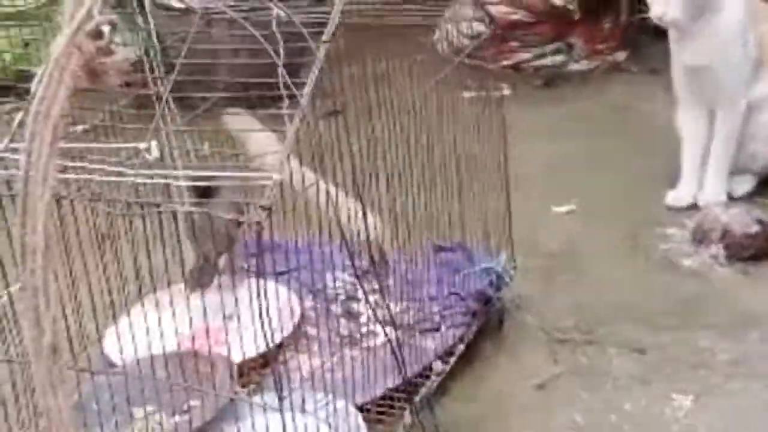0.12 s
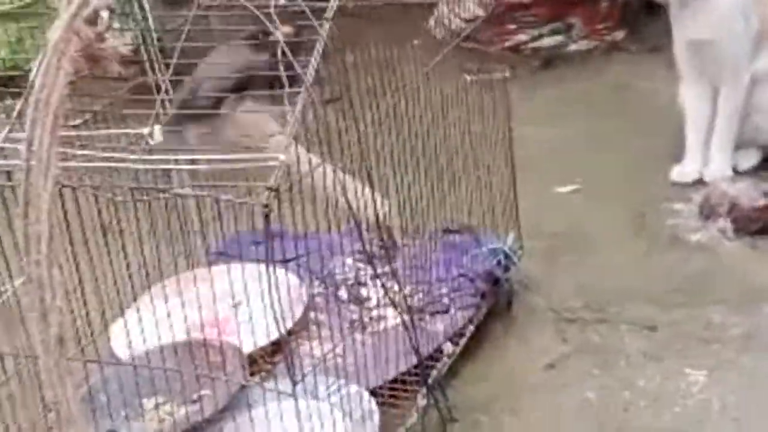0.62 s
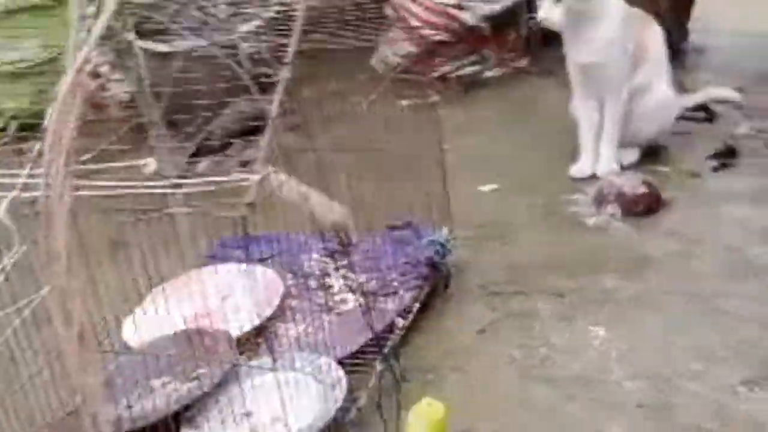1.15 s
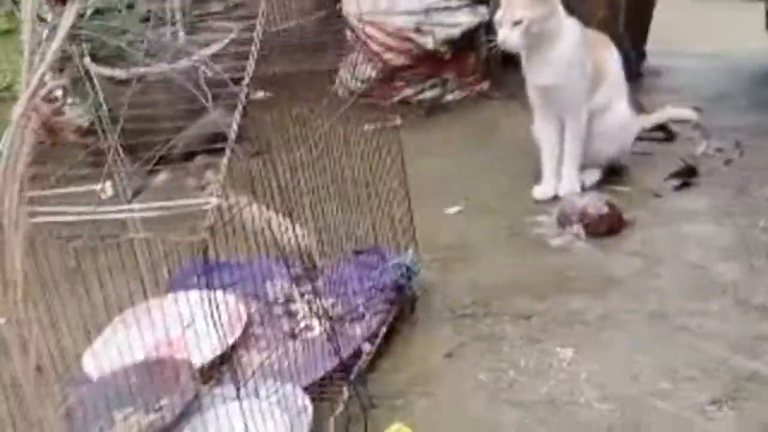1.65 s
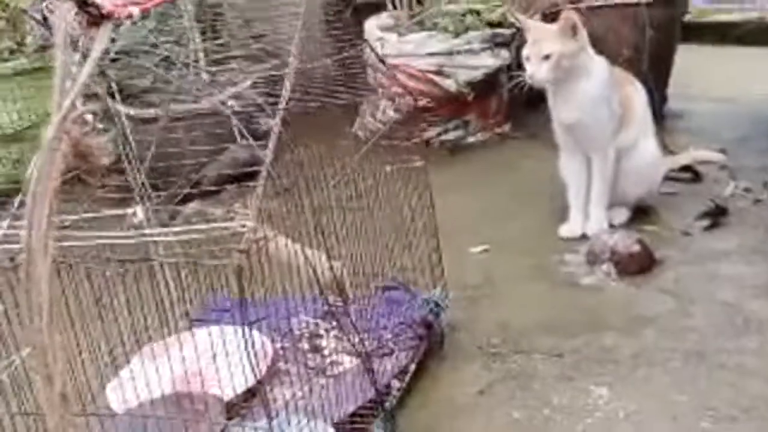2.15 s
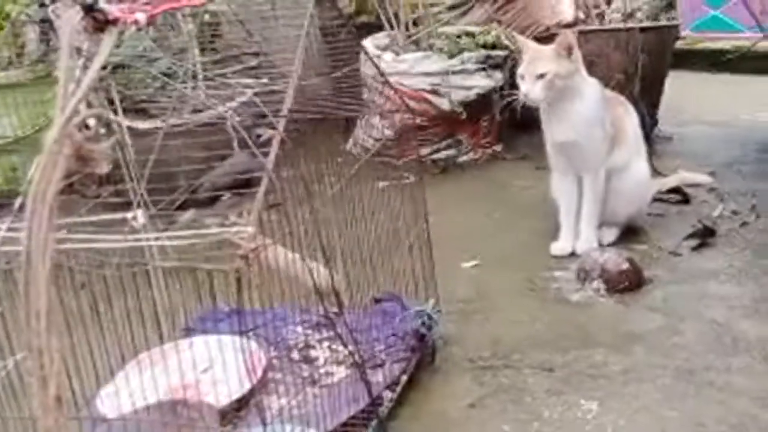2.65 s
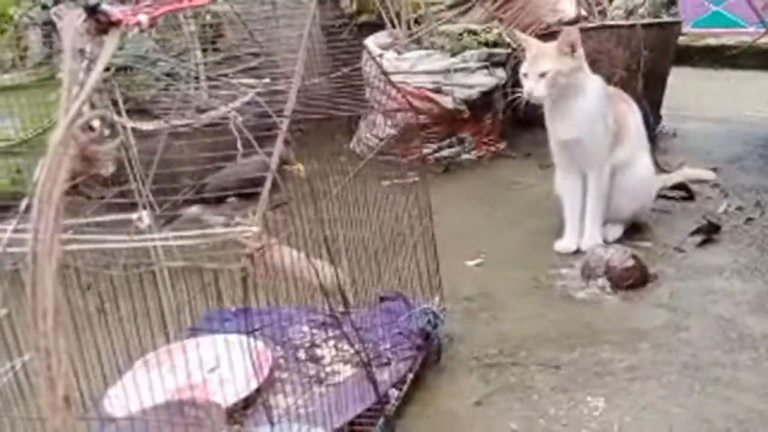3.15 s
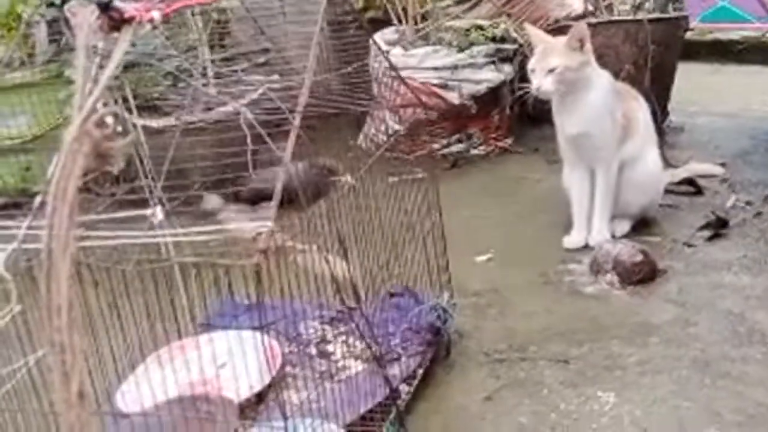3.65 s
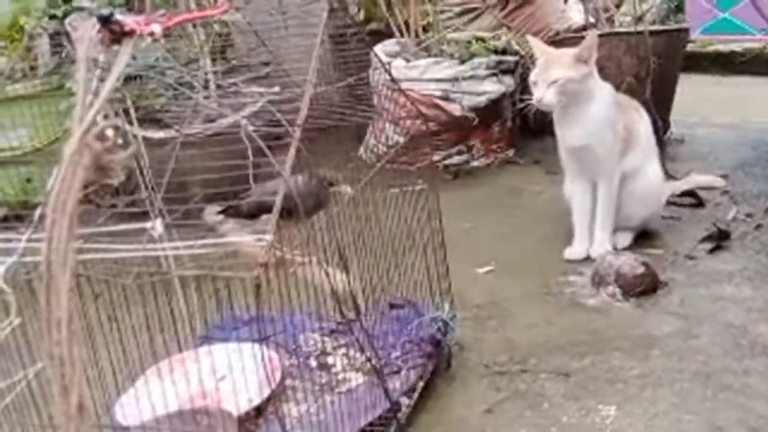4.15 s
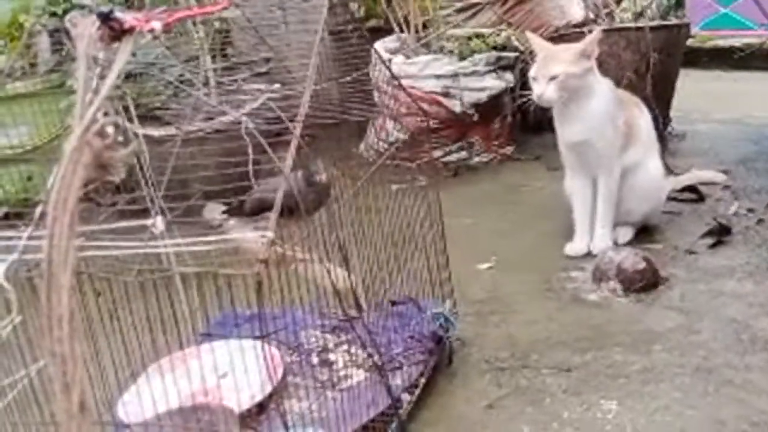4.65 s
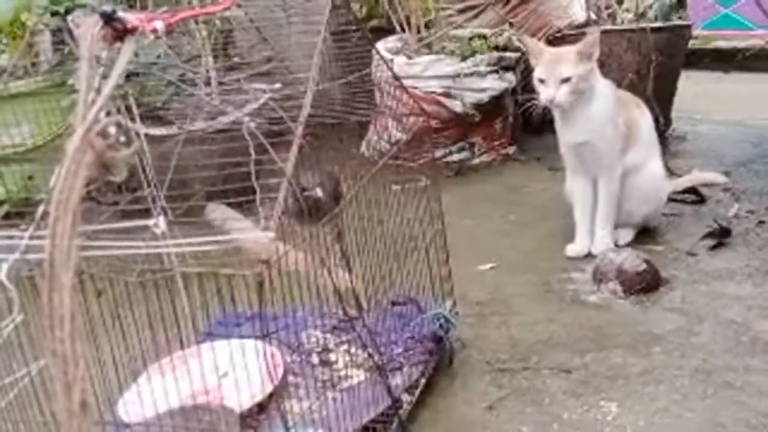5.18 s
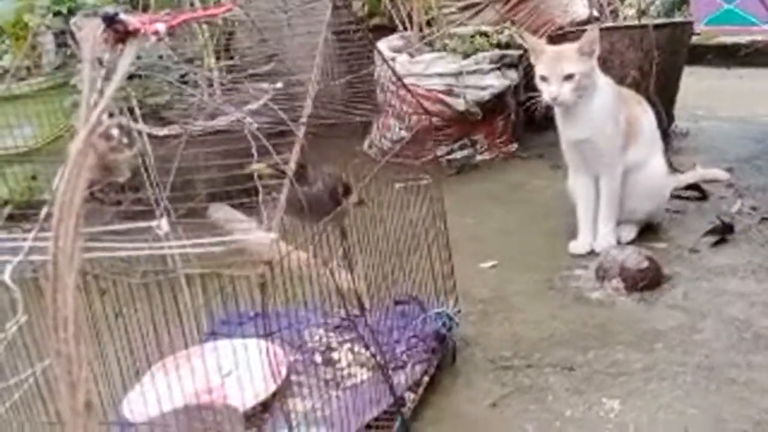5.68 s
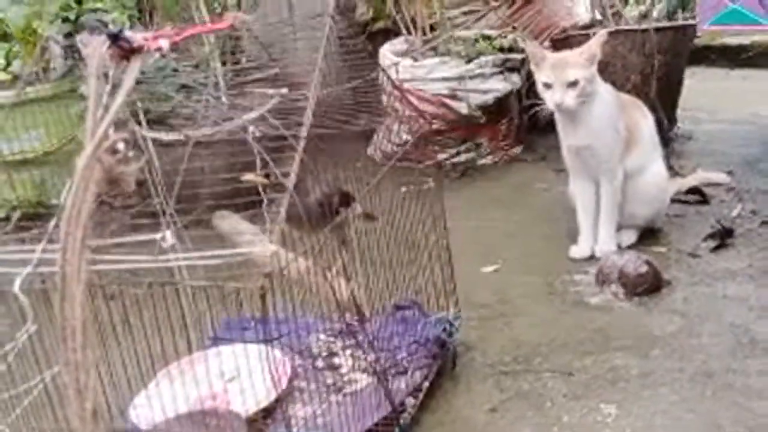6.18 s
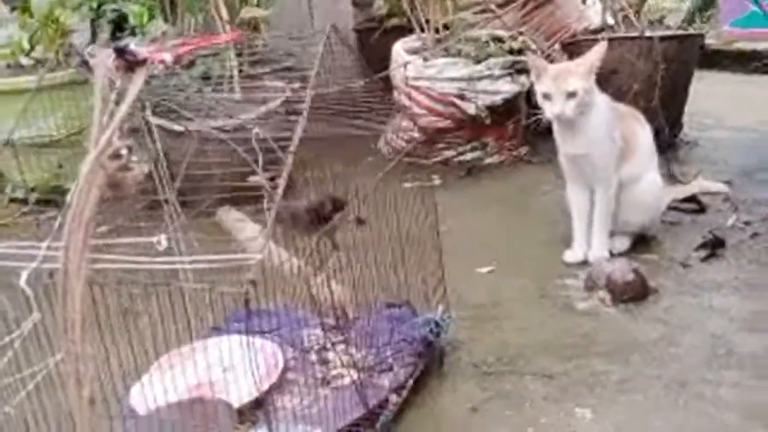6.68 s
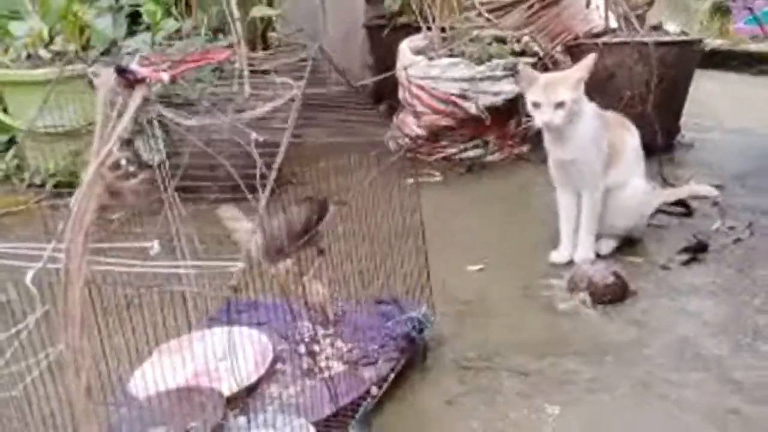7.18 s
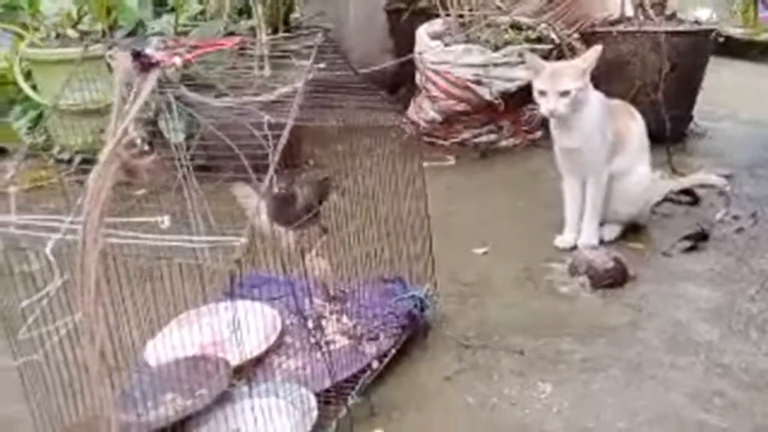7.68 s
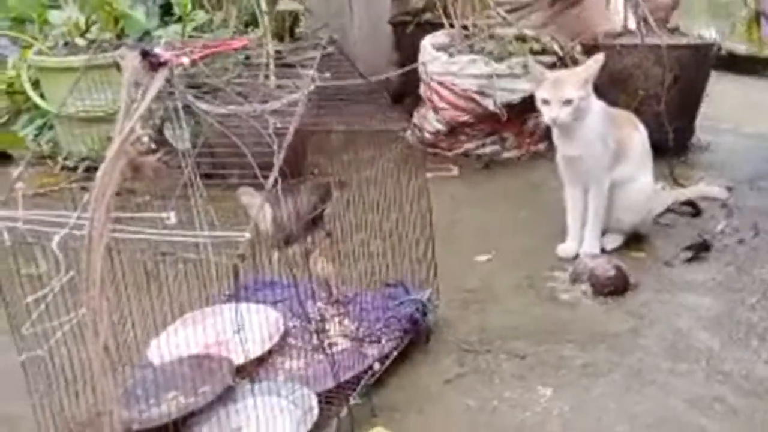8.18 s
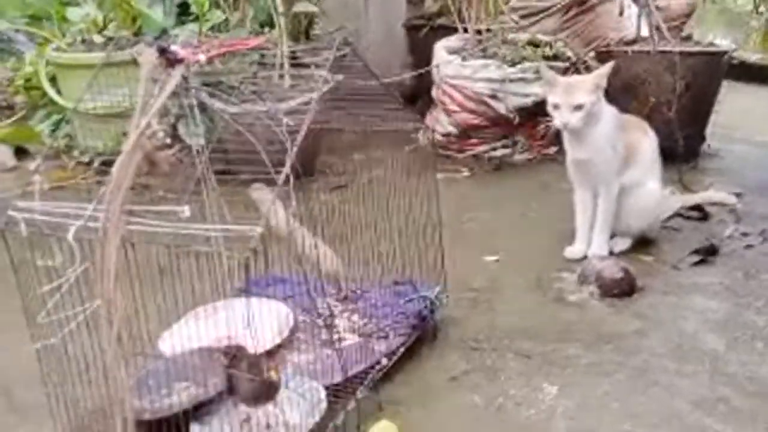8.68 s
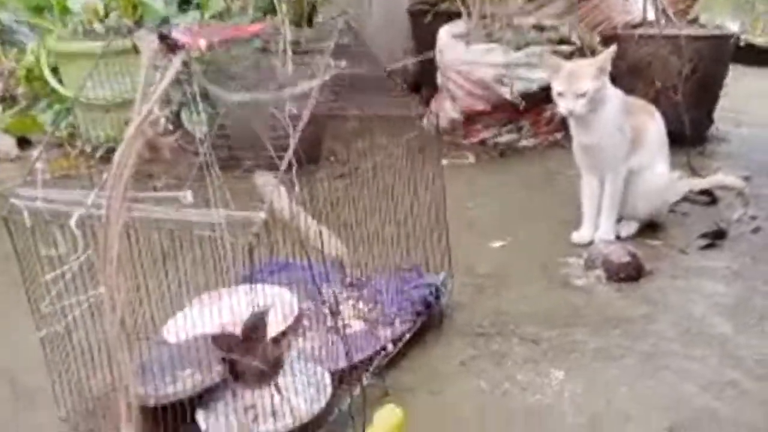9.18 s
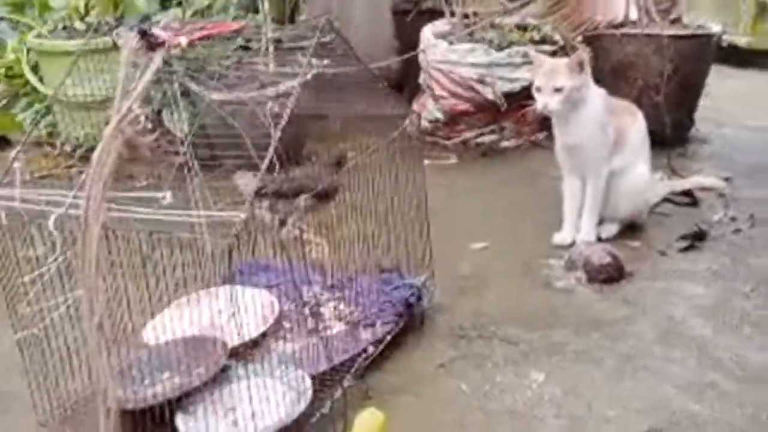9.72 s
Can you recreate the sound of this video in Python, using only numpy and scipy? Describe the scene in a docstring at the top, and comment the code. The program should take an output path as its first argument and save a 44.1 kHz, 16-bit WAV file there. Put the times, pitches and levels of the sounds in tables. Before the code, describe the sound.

Harsh, scratchy squawks from a nearby caged bird come in rapid pairs and triplets about every second, each note leaping up and sliding to a clearer tone. Between them are airy swishes and thin distant bird whistles. A faint low machine hum pulses nearly three times a second over steady outdoor air. One dull scuff and later one small metallic cage tick are heard. Short, slight reflections come from the yard.

```python
"""A caged bird in a yard calls in bursts of two or three harsh notes, from two shaky oscillators and breath noise.
Swishes of filtered hiss come and go, and far birds whistle as narrow bands of noise.
An electric machine hums with a slow throb, as a modulated tone with low noise in step.
The cage ticks and scuffs once each, over steady air noise and a dull far murmur."""
import sys
import numpy as np
from scipy import signal
from scipy.fft import rfft, irfft, next_fast_len
from scipy.io import wavfile
from scipy.ndimage import uniform_filter1d

SR = 44100
rng = np.random.default_rng(int(sys.argv[2]) if len(sys.argv) > 2 else 0)


def digitize_waveform(pressure):
    """Quantize a signal to 16-bit integers and store it at the path in sys.argv[1].

    Rows of a 2-D input are taken as channels; values are limited to [-1, 1].
    """
    field = np.atleast_2d(pressure).T
    bounded = np.clip(field, -1, 1)
    quanta = np.round(bounded * 32767).astype(np.int16)
    wavfile.write(sys.argv[1], SR, quanta)


N = 433503
TIME = np.arange(N) / SR   # s

# Spectra of noises, scaled to unit rms when used. Each row: frequency in Hz, relative density in dB per Hz.
AIR_COLOUR = [(25, -43.5), (70, -16), (145, -12.5), (277, -11.5), (990, -20.5), (1560, -35), (3080, -24),
              (4030, -36), (8360, -50.5), (11300, -45), (12200, -45), (15850, -33)]
MURMUR_COLOUR = [(220, -12), (450, -0.5), (900, -1), (2400, -7), (3200, -36.5)]
CHUG_COLOUR = [(85, -10.5), (120, -5), (170, 0), (260, -5.5), (400, -15)]
SWISH_CORE_COLOUR = [(1300, -9), (2000, 3.5), (3200, 13), (4400, 7.5), (5800, -22.5), (8000, -48)]
SWISH_EDGE_COLOUR = [(700, -20), (1300, -1), (2200, -2.5), (5000, 10.5), (8400, -4.5), (10000, -15.5),
                     (11500, -18), (12200, -17.5), (15300, -14.5), (15780, -11.5)]
SCUFF_COLOUR = [(200, -23.5), (300, -9.5), (450, -7.5), (600, -17.5), (970, -24), (1800, -24.5),
                (3300, -31)]
BREATH_COLOUR = [(1050, -69), (1400, -24), (2000, -48), (3400, 1.5), (5400, -12.5), (8500, -28),
                 (10200, -39), (11500, -33), (12000, -14.5), (15300, -8.5), (15750, -12.5)]
# Course of the dull far murmur. Each row: time in seconds, level in dB.
MURMUR_LEVEL = [(0, -61.5), (.6, -60.5), (1.2, -71.5), (9.1, -72), (9.35, -67.5), (9.83, -71)]
# Course of the machine's hum before its throb. Each row: time in seconds, level in dB.
HUM_LEVEL = [(0, -62), (.5, -57.5), (4.1, -57), (6.5, -56), (7.2, -59.5), (9.83, -57.5)]
# Faint whine of the machine. Each row: frequency in Hz, mean level in dB, width in Hz.
WHINES = [(1257, -73.5, 101)]
# Far whistles. Each row: start in seconds, end in seconds, start pitch in Hz, end pitch in Hz,
# level at the middle in dB, width in Hz, gain from start to end in dB.
WHISTLES = [(0.748, 1.113, 2150, 2110, -64.5, 71, 6), (1.365, 1.593, 3940, 3950, -58, 530, -27),
            (2.719, 2.81, 3570, 3640, -55, 78, 11), (2.45, 2.642, 700, 692, -62.5, 13, 17),
            (2.98, 3.25, 915, 873, -64.5, 42, 4), (3.037, 3.417, 2086, 2000, -50.5, 240, -11),
            (3.161, 3.401, 4430, 4280, -57.5, 55, 15), (3.184, 3.333, 2470, 2496, -52, 440, -10),
            (3.38, 3.643, 3750, 3990, -58.5, 290, 5), (3.728, 3.88, 3130, 3140, -61.5, 86, -1),
            (3.985, 4.118, 1980, 1960, -66, 160, -6), (4.003, 4.19, 3020, 3140, -55.5, 110, -1),
            (4.08, 4.279, 1248, 1234, -51.5, 10.4, -2), (4.531, 4.684, 3660, 3620, -60.5, 150, -1),
            (4.598, 4.673, 1300, 1284, -60, 13, 7), (4.666, 4.722, 2540, 2560, -57, 30, 0),
            (4.7, 4.812, 3870, 3630, -54, 200, 6), (5.056, 5.29, 4200, 4320, -58, 45, 7),
            (5.323, 5.513, 3770, 4140, -60.5, 120, -5), (6.592, 6.687, 1234, 1237, -64, 27, 0),
            (7.415, 7.54, 1247, 1234, -78, 45, 8), (7.47, 7.578, 3850, 4300, -69, 150, 2),
            (7.625, 7.937, 2346, 2300, -56.5, 170, -1), (7.709, 7.92, 1863, 1930, -57, 87, -10)]
# Swishes. Each row: start in seconds, swell in seconds, core level in dB, edge level in dB,
# fade of the core in dB per second; levels are relative, ahead of the flutter.
SWISHES = [(.36, 0.067, -55, -61, 70), (1.24, 0.2, -65, -60, 232), (1.716, 0.12, -50, -40, 90),
           (2.056, 0.067, -47.5, -42.5, 82), (2.379, 0.088, -44.5, -44.5, 82), (2.559, 0.091, -50, -58, 94),
           (2.75, 0.2, -50.5, -73, 67), (3.35, 0.06, -52, -66.5, 53), (3.964, 0.063, -50, -66, 108),
           (4.478, 0.2, -58.5, -69.5, 60), (4.779, 0.14, -39.5, -43.5, 105), (5.428, 0.25, -41, -54.5, 104),
           (5.98, 0.05, -52, -54.5, 88), (6.2, 0.3, -66, -69.5, 164), (7.098, 0.071, -40.5, -49, 90),
           (7.5, 0.13, -59, -72, 94), (7.884, 0.15, -48, -40, 69), (8.304, 0.16, -50, -45.5, 98),
           (8.731, 0.17, -46, -44.5, 111), (9.19, 0.032, -61, -55, 64), (9.33, 0.13, -46.5, -41.5, 102)]
# Resonances of the swishes. Each row: centre in Hz, width in Hz, height in dB.
SWISH_RINGS = [(3103, 270, -2.5), (4430, 41, 5.5), (9040, 2400, 8.5)]
# Modes of the cage wire. Each row: frequency in Hz, relative level in dB, decay by 60 dB in seconds.
WIRE_MODES = [(2150, -8, 0.036), (3920, 2.5, 0.019), (5730, 6.5, 0.034), (8140, 2, 0.03), (12500, 4, 0.011),
              (15000, 9, 0.018)]
# Bird notes. Each row: time of the arch top in seconds, shelf pitch in Hz, reference levels in dB
# of the arch, of the leap, of the shelf and of the shelf's upper partial.
NOTES = [(0.4483, 2723, -38, -36, -48, -56), (0.5419, 2520, -36.5, -34, -35, -48),
         (0.6453, 2400, -35.5, -37.5, -38, -69), (1.1895, 2633, -38, -37, -42, -41),
         (1.282, 2460, -37.5, -38, -43, -58), (1.774, 2586, -42.5, -35, -44, -41),
         (1.86, 2520, -38.5, -33, -38.5, -52), (1.951, 2292, -35.5, -29.5, -39.5, -55),
         (2.8, 2750, -35, -34.5, -31, -39.5), (2.8851, 2477, -32, -28, -33, -30.5),
         (2.971, 2310, -29, -25, -34, -33.5), (4.2286, 2610, -32.5, -33, -27.5, -42),
         (4.3104, 2426, -32, -28, -26.5, -37), (4.407, 2430, -30, -29.5, -25.5, -38),
         (5.5141, 2660, -38, -31, -35, -47), (5.6008, 2410, -35.5, -30.5, -26.5, -35.5),
         (6.3322, 2674, -39.5, -26, -30.5, -48), (6.4157, 2487, -41, -26.5, -30.5, -41),
         (6.5033, 2317, -37, -27, -30, -35), (6.9649, 2798, -39, -29, -33.5, -43),
         (7.047, 2518, -36, -34.5, -32, -33), (7.138, 2332, -32.5, -29.5, -29, -35.5),
         (7.925, 2782, -41.5, -31, -38.5, -42), (8.0057, 2444, -36, -31.5, -45, -49),
         (8.0918, 2446, -34.5, -25, -40, -60), (8.5326, 2744, -43.5, -31.5, -33.5, -40),
         (8.641, 2545, -41, -29, -32, -55), (8.7431, 2316, -35, -31.5, -32, -46),
         (9.2629, 2793, -42.5, -37, -44, -50), (9.3575, 2474, -39, -32, -43, -37.5)]
# Low voice within a note. Each row: time as a share of the note's nominal length, pitch over arch pitch,
# level relative to the arch in dB, roughness as a factor.
LOW_SHAPE = [(-.85, .82, -26, 1.2), (-.45, .8, -14, 1.1), (-.22, .82, -7, .8), (-.06, 1.01, 3, .35),
             (.05, 1.04, 5, .3), (.22, .88, -2, .6), (.5, .9, -16, 1.0)]
# High voice within a note. Each row: time as a share of the nominal length, share of arch pitch,
# share of shelf pitch, level relative to the leap in dB, level relative to the shelf in dB, roughness as a factor.
HIGH_SHAPE = [(-.65, 1.2, 0, -30, -60, 1.1), (-.2, 1.45, 0, -13, -60, 1.1), (.02, 1.68, 0, -6, -60, .8),
              (.22, 1.46, 0, -3, -56, 1.1), (.36, 0, 1.29, 0, -33, .75), (.48, 0, 1.3, 0, -30, .7),
              (.54, 0, 1.17, -10, -6, .6), (.62, 0, 1.02, -24, 3.5, .25), (.8, 0, .995, -40, 2.5, .17),
              (.97, 0, 1.005, -60, -3, .2), (1.14, 0, 1, -60, -22, .3)]
# Burst by burst. Each row: time in seconds, breathiness in dB, pitch factor of the low voice's lead-in.
BREATHINESS = [(.55, -3, 0.8), (1.24, 7, 0.92), (1.87, -2, 0.9), (2.9, -1, 1.13), (4.32, -9, 0.96),
               (5.57, 2, 0.82), (6.42, -7, 0.81), (7.06, -6.5, 0.87), (8.02, 2.5, .78), (8.6, -2, 1.1),
               (9.3, -2.5, 0.71)]


def from_db(db):
    """Level to amplitude: 20 dB is a factor of ten."""
    return 10 ** (np.asarray(db) / 20)


def rms_one(x):
    """Normalisation to unit root-mean-square."""
    return x / np.sqrt(np.mean(x ** 2) + 1e-20)


def in_time(rows):
    """Linear interpolation of table columns over all samples."""
    s, *columns = np.transpose(rows)
    return [np.interp(TIME, s, column) for column in columns]


def coloured(spectrum, rings=()):
    """Spectral shaping of white noise, with resonances and steep ends, at unit rms."""
    size = next_fast_len(N)
    hz = np.maximum(np.arange(size // 2 + 1), 1) * SR / size
    points = np.array(spectrum)
    db = np.interp(np.log(hz), np.log(points[:, 0]), points[:, 1], left=-120, right=-120)
    for centre_hz, width_hz, top_db in rings:
        db += top_db / (1 + (2 * (hz - centre_hz) / width_hz) ** 2)
    noise = rfft(rng.standard_normal(size))
    return rms_one(irfft(noise * from_db(db), size)[:N])


def drift(rate_hz, size=N):
    """Random modulation: white noise through a double-pole low-pass, at unit rms."""
    pole = np.exp(-2 * np.pi * rate_hz / SR)
    settle = 4000   # samples dropped while the filter fills
    white = rng.standard_normal(size + settle)
    return rms_one(signal.lfilter([1], [1, -2 * pole, pole * pole], white)[settle:])


def narrow_noise(hz, width_hz):
    """Quadrature modulation: a carrier of wandering height and phase is a narrow band of noise."""
    turn = 2 * np.pi * np.cumsum(hz) / SR
    in_phase = drift(width_hz / 2, size=len(hz))
    quadrature = drift(width_hz / 2, size=len(hz))
    return in_phase * np.cos(turn) + quadrature * np.sin(turn)


def patchy(x, depth_db, rate_hz):
    """Independent modulation of third-octave bands from 600 Hz, with the treble above them left steady."""
    edges = 600 * 2 ** (np.arange(14) / 3)   # Hz
    bands = []
    for pair in zip(edges, edges[1:]):
        band = signal.sosfilt(signal.butter(2, pair, "band", fs=SR, output="sos"), x)
        bands.append(band * from_db(depth_db * drift(rate_hz)))
    bands.append(signal.sosfilt(signal.butter(2, edges[-1], "high", fs=SR, output="sos"), x))
    # alternating signs let neighbours join without gaps
    return sum(band * (-1) ** k for k, band in enumerate(bands)) / np.sqrt(2)


def swell(start_s, swell_s, top_db, fade_db_per_s):
    """Envelope of a noise: a quick onset, a swell to the top, then exponential decay."""
    onset_s, rise_db = 0.03, 8.5
    t = np.arange(int((swell_s + 50 / fade_db_per_s) * SR)) / SR
    rise = -rise_db * np.clip(1 - t / swell_s, 0, 1)
    fade = -fade_db_per_s * np.maximum(t - swell_s, 0)
    gain = from_db(top_db + rise + fade) * np.clip(t / onset_s, 0, 1) ** 2
    out, first = np.zeros(N), int(start_s * SR)
    out[first:first + len(t)] = gain[:N - first]
    return out


def background():
    """Broadband noise: fluctuating air, and a murmur with two low resonances."""
    air = from_db(-67.5 + 2.1 * drift(17.0)) * coloured(AIR_COLOUR)
    murmur_rings = [(388, 16, 6.0), (450, 24, 6.0)]   # centre Hz, width Hz, height dB
    murmur_db = in_time(MURMUR_LEVEL)[0] + 2.0 * drift(3.8)
    return air + from_db(murmur_db) * coloured(MURMUR_COLOUR, murmur_rings)


def machine(depth=0.6, twist=0.23, chug_depth=0.7, lean=0.41):
    """Amplitude and phase modulation: a throbbing hum, noise chugging in step, a rumble that stops, a whine."""
    hum_hz, throb_hz, throb_origin_s = 200.47, 2.805, 0.154
    hum_db, = in_time(HUM_LEVEL)
    throb = 2 * np.pi * throb_hz * (TIME - throb_origin_s)
    beat = np.cos(throb - lean * np.cos(throb))   # lean makes rise and fall unequal
    chug_db = hum_db - 11 + 1.9 * drift(23)
    chug = from_db(chug_db) * (1 + chug_depth * beat) * coloured(CHUG_COLOUR)
    tone = np.sin(2 * np.pi * hum_hz * TIME - twist * np.sin(throb))
    flicker_db = 1.4 * drift(8)
    hum = np.sqrt(2) * from_db(hum_db + flicker_db) * (1 + depth * beat) * tone
    rumble_db = -73.5 - 166.5 * np.maximum(TIME - 4.16, 0)   # fades from 4.16 s, in dB per second
    out = chug + hum + from_db(rumble_db) * narrow_noise(np.full(N, 85.0), 5.9)
    for hz, db, width_hz in WHINES:
        out += from_db(db + 5 * drift(4)) * narrow_noise(np.full(N, float(hz)), width_hz)
    return out


def far_birds(fade_s=0.03):
    """Scattering: distance and echoes smear each gliding whistle into a narrow band of noise."""
    out = np.zeros(N)
    for start, end, hz0, hz1, mid_db, width_hz, gain_db in WHISTLES:
        span = slice(int(start * SR), int(end * SR))
        t = TIME[span]
        size = len(t)
        fade = np.clip(np.minimum(t - start, (end - t) / 1.87) / fade_s, 0, 1)   # slower at the end
        db = mid_db + gain_db * np.linspace(-.5, .5, size) + 4.1 * drift(4.5, size=size)
        hz = np.linspace(hz0, hz1, size) * (1 + 0.004 * drift(11.0, size=size))
        out[span] += from_db(db) * fade * narrow_noise(hz, width_hz)
    return out


def swishes(flutter_db=-0.62):
    """Addition of powers: a narrow core of hiss lingers while a wide edge dies first."""
    edge_fades_faster, rest_hiss_db = 1.37, -77
    core_power, edge_power = np.zeros(N), from_db(2 * rest_hiss_db)   # the edge never falls silent
    for start_s, swell_s, core_db, edge_db, fade in SWISHES:
        core_power = core_power + swell(start_s, swell_s, core_db, fade) ** 2
        edge_power = edge_power + swell(start_s, swell_s, edge_db, edge_fades_faster * fade) ** 2
    core = np.sqrt(core_power) * coloured(SWISH_CORE_COLOUR, SWISH_RINGS)
    edge = np.sqrt(edge_power) * coloured(SWISH_EDGE_COLOUR, SWISH_RINGS)
    return patchy(core + edge, depth_db=2.2, rate_hz=14) * from_db(flutter_db * drift(45))


def cage():
    """Modal decay: one tick rattles the wires; apart from it, a dull grainy scuff of noise."""
    scuff = swell(start_s=5.975, swell_s=0.082, top_db=-43, fade_db_per_s=92)
    out = scuff * from_db(1.2 * drift(72)) * coloured(SCUFF_COLOUR)
    tick = int(8.4515 * SR)
    t = np.arange(4000) / SR
    for hz, db, t60_s in WIRE_MODES:
        envelope = from_db(-30 + db - 60 * t / t60_s) * np.clip(t / 0.0019, 0, 1)
        ring = envelope * narrow_noise(np.full(len(t), float(hz)), 0.09 * hz)
        out[tick:][:len(t)] += ring / 2
    return out


def laid_out(share, rows):
    """Time scaling: one row of values per note, spread over its length; zero between notes."""
    note_s = 0.0365   # nominal length
    out = np.zeros(N)
    for (s, *_), row in zip(NOTES, rows):
        t = s + share * note_s
        near = slice(int(t[0] * SR), int(t[-1] * SR))
        out[near] = np.interp(TIME[near], t, row)
    return out


def voice(pitch_hz, rough, wobble=0.035, jitter=0.0407, rasp=0.91):
    """Frequency and amplitude modulation by noise: phase of a shaky oscillator and its rasping height."""
    shake = rough * (wobble * drift(71.5) + jitter * drift(257.5))
    shaken_hz = uniform_filter1d(pitch_hz, size=60) * (1 + shake)
    height = (1 + rasp * rough * drift(303)) * from_db(1.11 * drift(53))
    return 2 * np.pi * np.cumsum(shaken_hz) / SR, height


def low_voice(s, arch_hz, arch_db):
    """Pitch arch: an oscillator rises and falls, roughest in its lead-in."""
    share, on_arch, under_arch, rough = np.transpose(LOW_SHAPE)
    lead_in = np.where(share < -.2, np.interp(s, *np.transpose(BREATHINESS)[[0, 2]]), 1)
    pitch_hz = laid_out(share, on_arch * arch_hz * lead_in)
    turn, height = voice(pitch_hz, laid_out(share, rough + 0 * s))
    level = uniform_filter1d(laid_out(share, from_db(arch_db + under_arch)), size=200)
    return level * height * np.sin(turn)


def high_voice(s, arch_hz, shelf_hz, leap_db, shelf_db, over_db):
    """Pitch leap and glide: an oscillator peaks, slides to a clean shelf, and splits where rough."""
    share, on_arch, on_shelf, under_leap, under_shelf, rough = np.transpose(HIGH_SHAPE)
    pitch_hz = laid_out(share, on_arch * arch_hz + on_shelf * shelf_hz)
    rough = laid_out(share, rough + 0 * s)
    level = laid_out(share, from_db(leap_db + under_leap) + from_db(shelf_db + under_shelf))
    level = uniform_filter1d(level, size=100)
    turn, height = voice(pitch_hz, rough)
    main = level * height * np.sin(turn)
    split_turn, split_height = voice(.87 * pitch_hz, rough)
    strand = 0.35 * level * rough * split_height * np.sin(split_turn)
    # upper partial at 1.6 times the pitch, rougher than the voice
    over_turn, over_height = voice(1.6 * pitch_hz, rough + .5)
    over_level = laid_out(share, from_db(leap_db + under_leap - 21) + from_db(over_db + under_shelf))
    partial = uniform_filter1d(over_level, size=100) * over_height * np.sin(over_turn)
    return main + strand + partial


def breath(s, arch_db, leap_db, shelf_db, breath_db=-3, breath_s=0.014, lag_s=0.014):
    """Turbulence: a bell-shaped burst of noise at each leap, in proportion to the note's mean amplitude."""
    effort = np.zeros(N)
    mean_gain = (from_db(arch_db) + from_db(leap_db) + from_db(shelf_db)) / 3
    effort[((s[:, 0] + lag_s) * SR).astype(int)] = mean_gain[:, 0]
    bell = np.exp(-.5 * (np.arange(-3000, 3001) / SR / breath_s) ** 2)
    gain = from_db(breath_db + in_time(BREATHINESS)[0] + 1.76 * drift(96))
    puffs = signal.fftconvolve(effort, bell, "same") * coloured(BREATH_COLOUR) * gain
    return patchy(puffs, depth_db=4.5, rate_hz=45)


def bird():
    """Two-voiced source: the low voice arches, the high one shadows it and leaps, and breath adds noise."""
    s, shelf_hz, arch_db, leap_db, shelf_db, over_db = np.transpose(NOTES)[:, :, None]
    arch_hz = 2070 * (shelf_hz / 2500) ** 0.295   # arches vary less than shelves
    low = low_voice(s, arch_hz, arch_db)
    high = high_voice(s, arch_hz, shelf_hz, leap_db, shelf_db, over_db)
    call = np.sqrt(2) * (low + high) + breath(s, arch_db, leap_db, shelf_db)
    return signal.sosfilt(signal.butter(8, 1200, "high", fs=SR, output="sos"), call)


def yard(x):
    """Reverberation: walls and pots scatter sound into a short tail, dull at both ends, that blurs clear tones."""
    t60_s, tail_db = 0.21, -17
    t = np.arange(int(.4 * SR)) / SR
    tail = rng.standard_normal(len(t)) * from_db(-60 * t / t60_s) * np.clip(t / 0.0021, 0, 1)
    tail = signal.sosfilt(signal.butter(1, [1500, 5000], "band", fs=SR, output="sos"), tail)
    tail = tail / np.sqrt(np.sum(tail ** 2))
    blurred = x * (.5 + drift(150.0))
    return from_db(tail_db) * signal.fftconvolve(blurred, tail)[:N]


def scene():
    """Superposition of all sources at one microphone; bird and cage also excite the yard."""
    near = bird() + cage()
    return (near + yard(near) + swishes() + far_birds() + machine() + background())[None]


def band_limit(x):
    """A steep low-pass at the top of the band."""
    return signal.sosfilt(signal.butter(12, 16240, fs=SR, output="sos"), x)


def record(dry):
    """Low-pass filtering: a steep elliptic filter cuts the top at 15830 Hz."""
    cut = signal.sosfilt(signal.ellip(10, .5, 60, 15830, fs=SR, output="sos"), dry)
    return band_limit(cut)


dry = scene()
out = record(dry)
digitize_waveform(out)
```